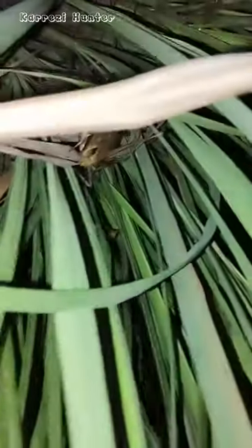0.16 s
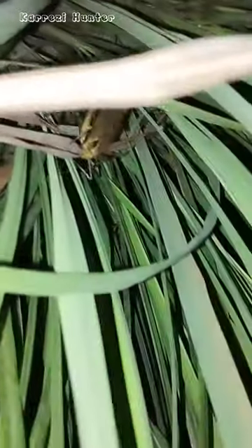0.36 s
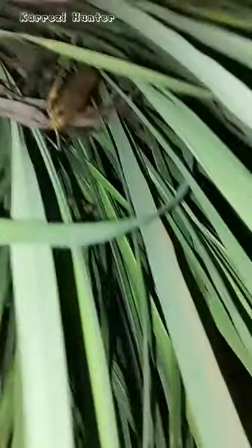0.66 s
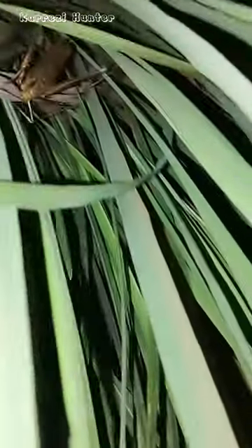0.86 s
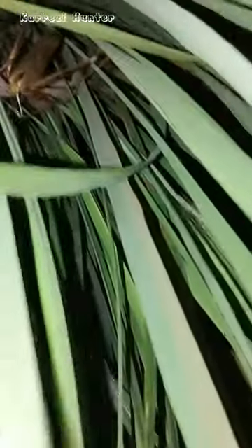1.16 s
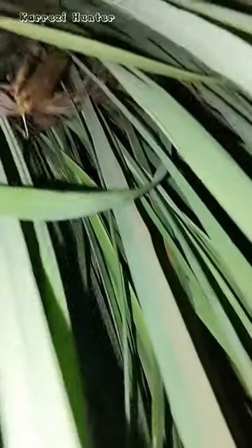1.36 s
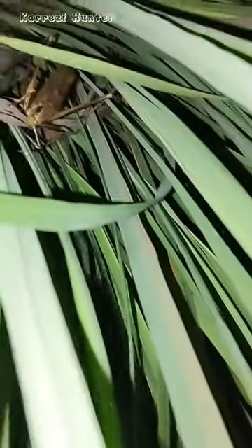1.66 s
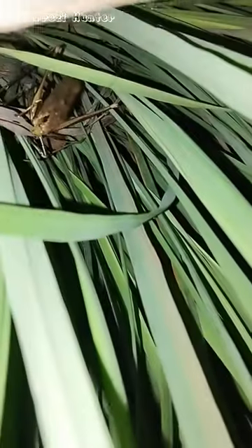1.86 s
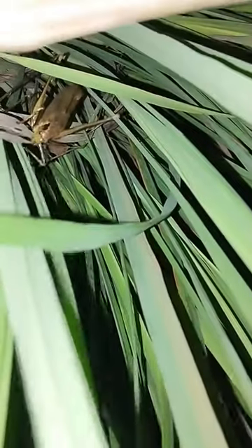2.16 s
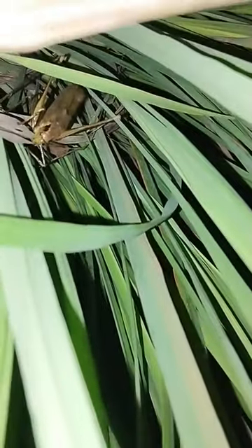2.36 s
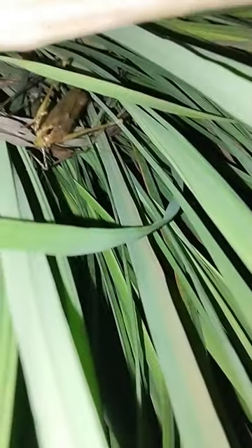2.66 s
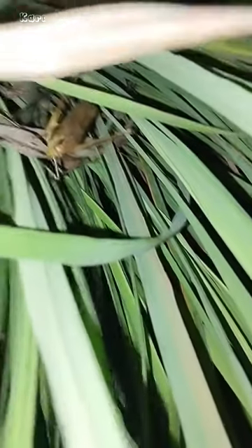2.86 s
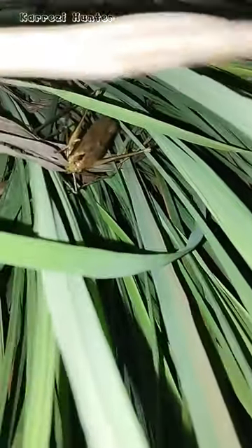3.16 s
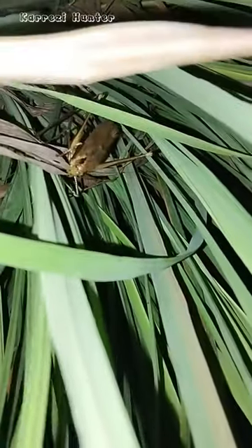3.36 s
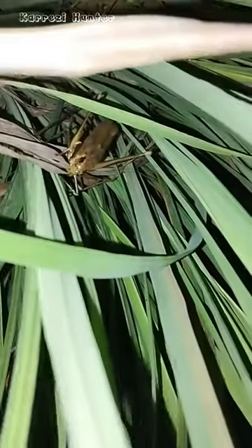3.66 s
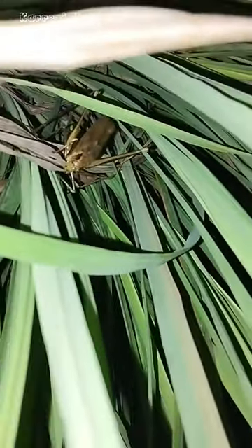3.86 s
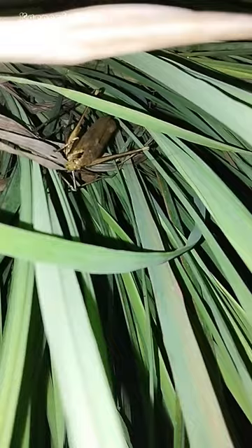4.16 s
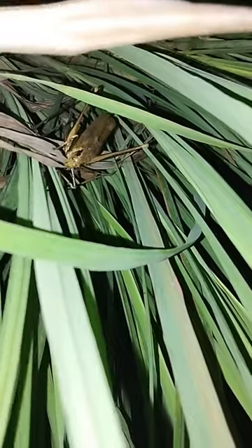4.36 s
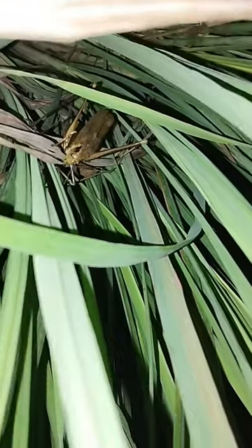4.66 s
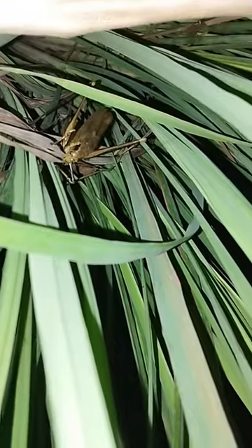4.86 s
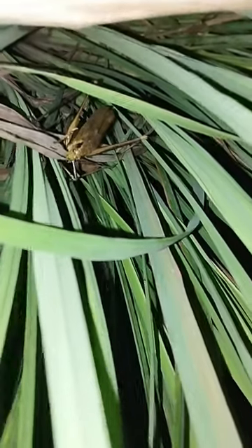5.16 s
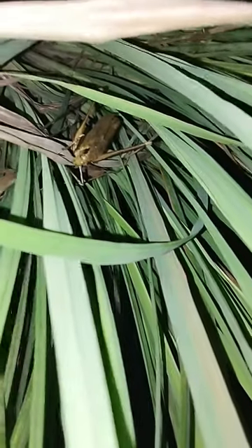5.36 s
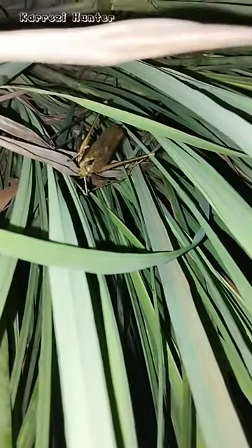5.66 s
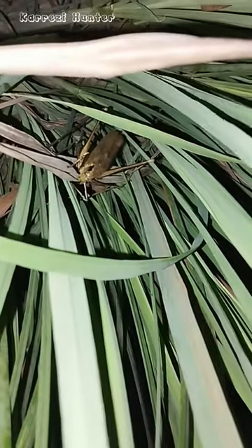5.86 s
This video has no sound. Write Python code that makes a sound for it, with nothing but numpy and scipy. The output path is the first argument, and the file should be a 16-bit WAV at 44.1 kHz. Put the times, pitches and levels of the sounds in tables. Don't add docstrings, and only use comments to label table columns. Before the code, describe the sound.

Outdoors at night in long grass, a katydid sings loudly a hand's width from a handheld stereo microphone. The sound is a dry, metallic, rasping buzz around 6 to 7 kHz, made of quick scraping strokes grouped in threes, roughly sixteen groups per second, each group swelling to a sharp snap. It runs from 0 to 0.42 s, breaks briefly with a small leaf tick, then continues until 1.2 s. In the pause to about 1.37 s, grass rustles and ticks; a soft thud follows near 1.45 s. Short, harder bursts resume, with stuttering gaps around 1.45, 2.2 and 2.4 s, then longer runs with small breaks near 3.0, 3.55, 4.87 and 5.17 s, another tick at 4.9 s, and buzzing to the end at 6 s. Tone and side balance shift with movement; strong strokes crackle slightly. Faint distant insects and low rumble remain underneath.

```python
import sys
import numpy as np
from scipy import signal
from scipy.fft import rfft, irfft, next_fast_len
from scipy.io import wavfile
from scipy.ndimage import uniform_filter1d, map_coordinates

SR = 44100
rng = np.random.default_rng(int(sys.argv[2]) if len(sys.argv) > 2 else 0)


def to_wav(sig):
    pcm = np.clip(np.atleast_2d(sig), -1, 1) * 32767
    pcm = np.round(pcm).astype(np.int16)
    wavfile.write(sys.argv[1], SR, pcm.T)


def gain_from_db(level_db):
    decades = np.asarray(level_db, float) / 20
    return 10 ** decades


N = 265041

STARTS = [0.464, 1.367, 1.508, 2.24, 2.4, 3.013, 3.586, 4.909, 5.187]


def curve(s, v):
    return np.interp(np.arange(N) / SR, s, v)


def unit(x):
    return x / np.sqrt(np.mean(x ** 2))


def colour(x, table):
    hz, db = np.transpose(table)
    size = next_fast_len(N)
    log_hz = np.log(np.fft.rfftfreq(size, 1 / SR) + 1)
    gain = gain_from_db(np.interp(log_hz, np.log(hz), db))
    return irfft(rfft(x, size) * gain, size)[..., :N]


def mode(x, hz, width_hz):
    return signal.lfilter(*signal.iirpeak(hz, hz / width_hz, SR), x)


def bumps(s, db, width_s):
    train = np.zeros(N)
    at = np.round(s * SR).astype(int)
    inside = (at >= 0) & (at < N)
    np.add.at(train, at[inside], gain_from_db(db[inside]))
    t = np.arange(-400, 401) / SR
    bell = np.exp(-.5 * (t / width_s) ** 2)
    return np.clip(signal.fftconvolve(train, bell, "same"), 0, None)


def slow(rate):
    k = int(SR / rate)
    return unit(uniform_filter1d(uniform_filter1d(rng.standard_normal(N), k), k))


def strokes():
    # (last snap of the first triplet [s], last snap of the final one [s],
    # snap level [dB], drag level [dB], how uneven the three strokes are [0-2])
    triplets = [(0.043, .419, -15, -10.5, 1.11), (.514, .821, -10.5, -10, 0.588),
                (.884, 1.202, -13.5, -9, 1), (1.424, 1.424, -10, -21.5, .4),
                (1.652, 1.652, -4, -16.5, 0.17), (1.761, 1.951, -3.5, -13.5, 0.24),
                (2.06, 2.123, -3, -14.5, 0.13), (2.292, 2.292, -9.5, -15, 0.17),
                (2.452, 2.644, -4, -15.5, 0.56), (2.707, 2.956, -7, -8, 0.93),
                (3.064, 3.504, -6.5, -13, 0.95), (3.636, 3.636, -7.5, -16, 0.98),
                (3.75, 3.998, -6.5, -11.5, 1.04), (4.064, 4.125, -10, -10, 1),
                (4.194, 4.451, -5, -11, 1.06), (4.521, 4.711, -6.5, -15, 0.61),
                (4.776, 4.842, -5, -14, 0.88), (4.959, 5.157, -5.5, -14, 0.88),
                (5.241, 5.566, -7, -14, 0.63), (5.634, 5.766, -4.5, -15, 1.02),
                (5.83, 6.026, -4.5, -9.5, 1.45)]
    # (last snap [s], snap level [dB], drag level [dB], unevenness [0-2])
    pairs = [
        (1.54, -10.5, -22.5, 0.68),
        (1.586, -5.5, -15.5, 0.84),
        (1.694, 0, -18.5, 0.77),
        (1.995, -5, -11.5, 1.3),
        (2.166, -11.5, -11, 0.97),
        (2.334, -6, -18, 1.62),
        (3.681, -14, -22, 1.5),
    ]
    # (time [s], lead [s])
    middle_lead = [(0, 0.02), (.45, 0.018), (.55, 0.019), (1.2, 0.023), (1.6, 0.024), (2.6, .0195),
                   (4.5, 0.02), (6.01, .021)]
    usual_spacing_s = .064
    first_lead_s, waking_lead_s = .0415, 0.0033
    waking_db = -6
    snap_step_db, drag_step_db = (-5, -1.2, 0), (-13.5, -5.5, 0.5)
    scatter_s, snap_scatter_db, drag_scatter_db = .0006, 1.2, 1.2

    groups = [(s, 0, *row) for s, *row in pairs]
    for first, last, *row in triplets:
        count = int(round((last - first) / usual_spacing_s)) + 1
        groups += [(end, 1, *row) for end in np.linspace(first, last, count)]
    end, full, snap_db, drag_db, uneven = np.transpose(sorted(groups))

    since_start = end - first_lead_s - np.array(STARTS)[:, None]
    waking = np.any((since_start > 0) & (since_start < .02), axis=0)
    chance = rng.standard_normal((len(end), 3, 3)).T
    lead_s = [first_lead_s + waking_lead_s * waking, np.interp(end, *np.transpose(middle_lead)), 0 * end]
    s = end - lead_s + scatter_s * chance[0]
    snap_db = snap_db + np.outer(snap_step_db, uneven) + snap_scatter_db * chance[1]
    snap_db = snap_db + np.outer([1, 0, 0], waking_db * waking)
    drag_db = drag_db + np.outer(drag_step_db, uneven) + drag_scatter_db * chance[2]

    played = np.array([full > 0, full >= 0, full >= 0]).T
    opening = np.array([full > 0, full < 1, full < 0]).T
    return s.T[played], snap_db.T[played], drag_db.T[played], opening[played]


def scraper():
    reopen_db = (-0.5, -8, -18.5)
    s, snap_db, drag_db, opening = strokes()
    t = np.arange(N) / SR
    chance = rng.standard_normal((len(s), 8)).T

    snap = bumps(s - .0001, snap_db, width_s=0.0013)
    catch_db = 0.31 * snap_db + 0.14 * np.maximum(drag_db, snap_db - 9.5) - 4.0 + 0.91 * chance[0]
    catch = bumps(s - .005 + .0004 * chance[1], catch_db, width_s=.0006)
    drag = 0
    for k, (lead_s, jerk_db) in enumerate([(.0085, 3), (.0118, -1), (.0155, -3.0)]):
        jerk_s = s - lead_s + 0.00035 * chance[2 + k]
        level_db = drag_db + jerk_db + reopen_db[k] * opening + 0.48 * chance[5 + k]
        drag = drag + bumps(jerk_s, level_db, width_s=0.0014)

    to_start = np.array(STARTS + [99])[np.searchsorted(STARTS, t)] - t
    engaged = np.clip(np.maximum(1 - to_start / 0.00025, (to_start - .02) / .001), 0, 1)
    nearest = np.clip(np.searchsorted(s + .004, t), 0, len(s) - 1)
    since_snap = t - s[nearest]
    snapping = snap / (snap + catch + drag + 1e-4)
    return (snap + catch) * engaged, drag * engaged, snapping, since_snap


def tooth_strikes(snapping, since_snap):
    tooth_hz = curve([0, 3.0, 6.01], [6750, 6750, 7150])
    tooth_hz = tooth_hz + 850 * np.tanh(since_snap / 0.0017) * snapping
    phase = 2 * np.pi * np.cumsum(tooth_hz * (1 + .08 * slow(1500))) / SR
    teeth = np.sin(phase) * gain_from_db(1.5 * slow(1200)) + .55 * rng.standard_normal(N)
    teeth = mode(teeth, 5950, 1400)
    strength = uniform_filter1d(teeth ** 2 + 1e-3, size=40)
    return unit(teeth / strength ** .35)


def wing_mirror(snaps, drag, teeth, trims_db):
    # (frequency [Hz], width [Hz], level [dB])
    mirror = [(5828, 390, 7), (6465, 1100, -1.5), (6863, 207, 2), (7020, 1080, -25)]
    force = snaps + drag
    low_push = snaps + .62 * drag
    pushes = [low_push, force, force, force ** 0.38 * gain_from_db(13)]
    song = 0
    for push, trim_db, (hz, width_hz, db) in zip(pushes, trims_db, mirror):
        song = song + gain_from_db(db + trim_db) * mode(push * teeth, hz, width_hz)
    song = colour(song, [(4000, 0.5), (5200, 1.0), (7500, 0.5), (8200, -9.5), (10000, -9)])
    return unit(song) * gain_from_db(-17)


def wing_body(snaps, drag, since_snap, scrape_db):
    # (frequency [Hz], level [dB])
    body_tone = [(1500, -14), (2200, -0.5), (3000, -1), (3800, -2), (4600, 2.5), (5300, 2), (6000, -16.5)]
    whine_hz = np.clip(3700 - 110000 * (since_snap + .009), 2900, 5000) * (1 + 0.14 * slow(500))
    whine = np.sin(2 * np.pi * np.cumsum(whine_hz) / SR)
    shared, *own = rng.standard_normal((3, N))
    push = (drag + 0.45 * snaps) ** 0.67
    scrape = [unit(colour(push * (whine + 1.2 * shared + 0.77 * x), body_tone)) for x in own]
    return np.array(scrape) * gain_from_db(-36.5 + scrape_db)


def katydid(low_db, middle_db, high_db, scrape_db):
    snaps, drag, snapping, since_snap = scraper()
    teeth = tooth_strikes(snapping, since_snap)
    ring = wing_mirror(snaps, drag, teeth, [low_db, middle_db, 0, high_db])
    return ring + wing_body(snaps, drag, since_snap, scrape_db), snaps + drag


def left_port(x, lead):
    # (frequency [Hz], level [dB], phase lead [radians])
    edge = [(100, -2, 0.89), (2170, -2, 2.31), (3710, -11.5, 4.45), (4460, -2.5, 6.64), (5590, -5, 7.55),
            (6060, -17, 7.6), (6750, -6.5, 10.7), (7040, -13, 12.5), (7556, -3, 14.4), (9230, 9.5, 23.5)]
    hz, db, radians = np.transpose(edge)
    f = np.fft.rfftfreq(N, 1 / SR)
    turn = np.exp(1j * np.interp(f, hz, radians))
    x = irfft(rfft(x) * gain_from_db(np.interp(f, hz, db)) * turn, N)
    return map_coordinates(x, [np.clip(np.arange(N) + lead, 0, N - 1)], order=3)


def leaf(x):
    # (time [s], extra path [ms], level [dB])
    echo_path = [
        (0, 0.78, -9),
        (0.501, 0.85, -10),
        (1.15, 0.843, -11),
        (1.4, 0.883, -22),
        (1.7, .87, -44),
    ]
    s, late_ms, db = np.transpose(echo_path)
    at = np.clip(np.arange(N) - curve(s, late_ms) * SR / 1000, 0, N - 1)
    echo = np.array([map_coordinates(side, [at], order=3) for side in x])
    return x - gain_from_db(curve(s, db)) * echo


def grass(x):
    t = np.arange(4000) / SR
    tails = rng.standard_normal((2, len(t))) * gain_from_db(-60 * t / 0.063)
    return gain_from_db(-37.0) * np.array([signal.fftconvolve(x, tail)[:N] for tail in tails])


def rasp(force, high_db):
    # (frequency [Hz], level [dB])
    bands = [
        [(7000, -23.5), (7800, -1.5), (8600, -2), (9300, -14.5), (9800, -5.5), (10300, -60)],
        [(10000, -27), (10600, -12), (11500, -9), (12600, -19), (13200, -60)],
        [(13900, -75), (14300, -3), (15000, -9), (15700, -5), (15900, -42)],
    ]
    out = 0
    for band, trim_db, patchy_db in zip(bands, [high_db, 0, 0], [1.5, 1.6, 1.6]):
        shared, *own = rng.standard_normal((3, N))
        squeezed = force ** 0.3 * gain_from_db(trim_db + patchy_db * slow(7.0))
        out = out + np.array([colour(squeezed * (0.56 * shared + x), band) for x in own])
    return gain_from_db(-40.0) * unit(out)


def overdrive(force, db, pan_db):
    # (frequency [Hz], level [dB])
    crackle_tone = [(20, -2.5), (150, 9), (1500, 8), (3000, 1), (5000, -36)]
    side_db = np.array([pan_db, -pan_db]) / 2
    quick_force = np.abs(uniform_filter1d(force, size=90))
    usual_force = uniform_filter1d(force + 1e-4, size=22050)
    excess = np.tanh((quick_force / usual_force / 3.6) ** 2.5)
    crackle = []
    for _ in range(2):
        noise = excess * gain_from_db(2 * slow(133)) * rng.standard_normal(N)
        crackle.append(colour(noise, crackle_tone))
    return (gain_from_db(db - 22 + side_db) * unit(np.array(crackle)).T).T if side_db.ndim == 1 else (
        gain_from_db(db - 22 + side_db) * unit(np.array(crackle)))


def far_chorus():
    # (frequency [Hz], level [dB])
    night_tone = [(20, 1), (200, -16.5), (600, -50), (4800, -47), (5800, -9), (6800, -2), (7800, -42),
                  (9000, -55)]
    shared, *own = rng.standard_normal((3, N))
    rumble_tone = [(20, 2.0), (60, -9.5), (170, -11.5), (260, -41)]
    rumble = colour(shared * gain_from_db(1.3 * slow(13.0)), rumble_tone)
    air = np.array([colour(x, night_tone) * gain_from_db(1.6 * slow(26.0)) + rumble for x in own])
    return unit(air) * gain_from_db(-48)


def rustle():
    # (time [s], level [dB])
    brushing = [
        (0, -102),
        (.45, -72),
        (1.15, -70),
        (1.3, -52),
        (1.4, -56),
        (1.5, -64.5),
        (6.01, -85),
    ]
    # (frequency [Hz], level [dB])
    leaf_tone = [(300, 5), (2500, -9.5), (5000, 0), (7500, -4), (9000, -16), (11000, -19), (13000, -25),
                 (15500, -9)]
    sides = [unit(colour(x * gain_from_db(4.18 * slow(42)), leaf_tone)) for x in rng.standard_normal((2, N))]
    return gain_from_db(curve(*np.transpose(brushing))) * np.array(sides)


def grass_touches():
    # (time [s], level [dB])
    touches = [
        (0.434, -41),
        (1.226, -46),
        (1.252, -43),
        (1.293, -54),
        (1.317, -54),
        (1.339, -45.5),
        (1.445, -56),
        (1.475, -101),
        (4.898, -43),
    ]
    s, db = np.transpose(touches)
    blade_tone = [(300, 5.5), (2500, -4), (4500, -2.5), (5400, -18), (6500, -28)]
    ticks = colour(bumps(s, db, width_s=0.0015) * rng.standard_normal(N), blade_tone)
    thud = bumps(np.array([1.447]), np.array([-30.]), width_s=0.0023) * rng.standard_normal(N)
    thud = colour(thud, [(100, 0), (400, -1), (900, -21), (1500, -32)])
    return ticks * gain_from_db(-1.5) + thud


def scene():
    # (time [s], left port level [dB], extra left lead [samples], low mode level [dB],
    # facing: left minus right of the overdrive [dB])
    phone = [(0, 8.5, 3, -6.5, 35), (0.499, 2.5, 3, -4, 13.5), (1.0, 8, 5.5, -5.5, 27.5),
             (1.2, 3.5, 4, -7, 3), (1.4, 2.5, 3.5, 7.5, 2), (1.6, -1.5, 1.5, 3, -13.5),
             (2.0, -3.5, 1.3, 4, -17), (2.6, -0.5, .6, 1.4, -16), (3.3, -3, -2, 5, -17.5),
             (4.2, 1, -0.63, -2, -19.5), (5.1, 2.5, -0.65, -2, -12), (6.01, 0, -1.5, -6.3, -12.5)]
    s, *columns = np.transpose(phone)
    left_db, lead, low_db, facing_db = (curve(s, c) for c in columns)
    high_db = -0.2 * facing_db
    middle_db = 0.5 + 0.86 * lead - 0.23 * facing_db
    scrape_db = 0.87 + 0.6 * low_db
    (left, right), force = katydid(low_db, middle_db, high_db, scrape_db)
    direct = np.array([gain_from_db(left_db) * left_port(left, lead), right])
    song = leaf(direct) + grass(right) + rasp(force, high_db)
    crackle = overdrive(force, -33 + 0.017 * facing_db, facing_db)
    return song + crackle + far_chorus() + rustle() + grass_touches()


def faint_gaps(x):
    # (low edge [Hz], high edge [Hz], share of time missing [0-1])
    gaps = [(2000, 2350, .06), (2350, 2700, .16), (2700, 3100, .12), (9000, 9400, .25), (9400, 9900, .55),
            (10300, 10800, .4), (10800, 11500, .1), (11500, 12100, .45), (12100, 12600, .6),
            (12600, 13200, .8), (14000, 14500, .75), (14500, 14900, .45), (14900, 15300, .2)]
    f, t, frames = signal.stft(x, SR, nperseg=1024)
    for low_hz, high_hz, share in gaps:
        quick, lazy = rng.standard_normal((2, len(t)))
        walk = uniform_filter1d(quick, size=4) + 2 * uniform_filter1d(lazy, size=30)
        frames[:, (f >= low_hz) & (f < high_hz)] *= walk > np.quantile(walk, share)
    return signal.istft(frames, SR, nperseg=1024)[1][:, :N]


def top_cut(x):
    return signal.sosfilt(signal.butter(12, 17180, fs=SR, output="sos"), x)


def record(dry):
    # (frequency [Hz], level [dB])
    port_tone = [(20, 1.5), (9500, 1), (10000, -41), (10300, -11), (10600, -0.5), (12800, -8), (13150, -45),
                 (14000, -45), (14200, -6), (15750, 4.5), (16000, -46), (16800, -60)]
    soft = np.tanh(1.25 * dry) / 1.25
    mix = faint_gaps(colour(soft, port_tone))
    return top_cut(mix)


dry = scene()
out = record(dry)
to_wav(out)
```